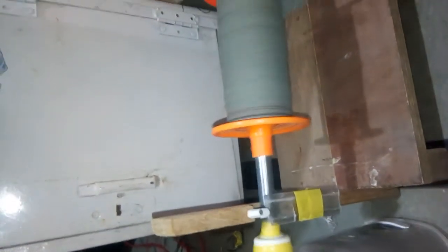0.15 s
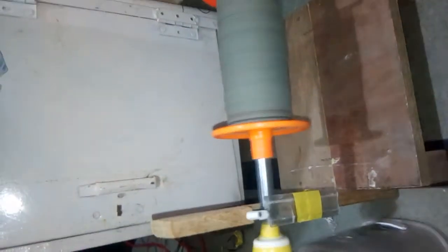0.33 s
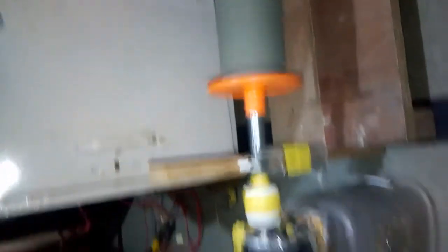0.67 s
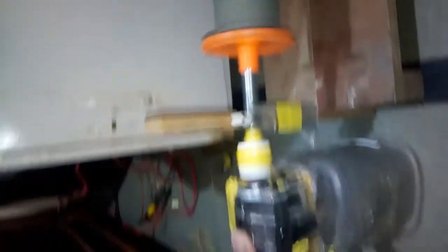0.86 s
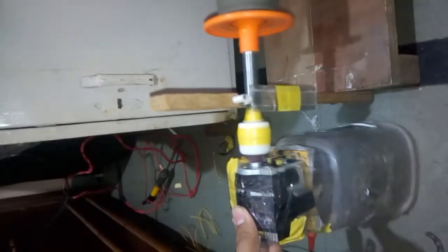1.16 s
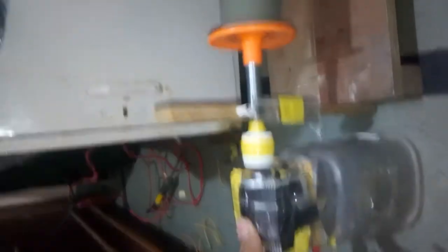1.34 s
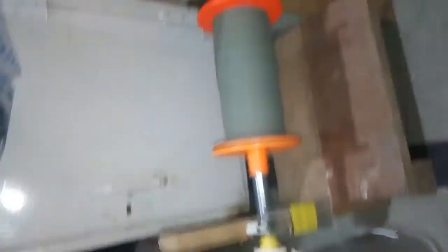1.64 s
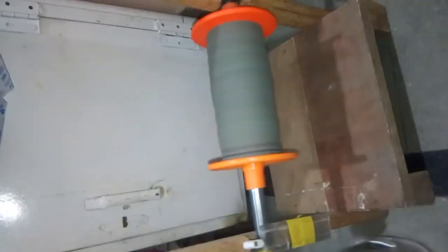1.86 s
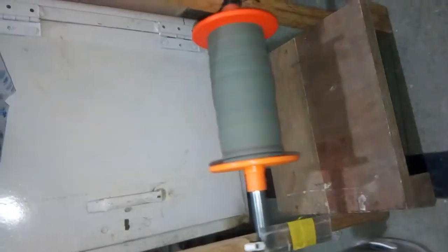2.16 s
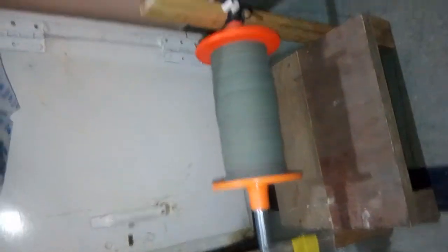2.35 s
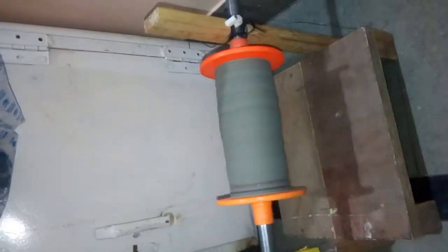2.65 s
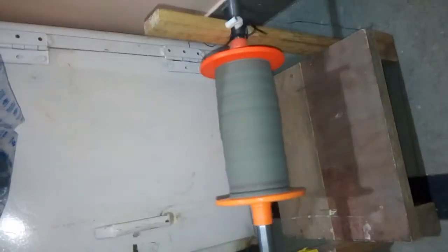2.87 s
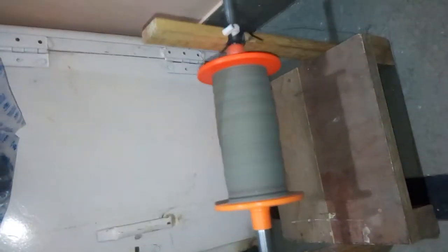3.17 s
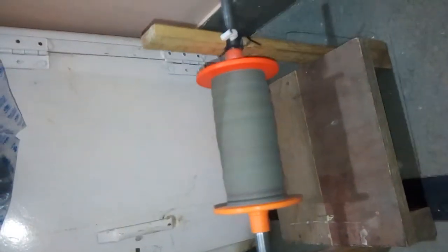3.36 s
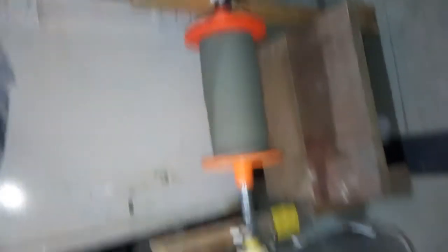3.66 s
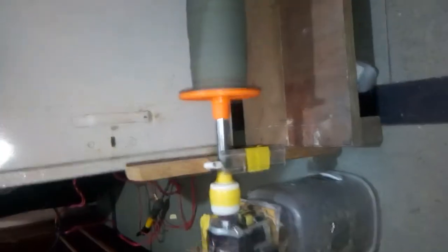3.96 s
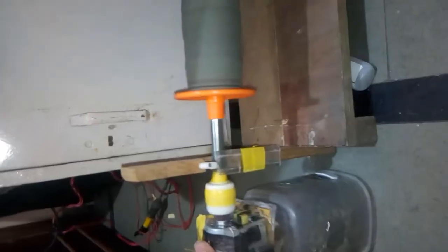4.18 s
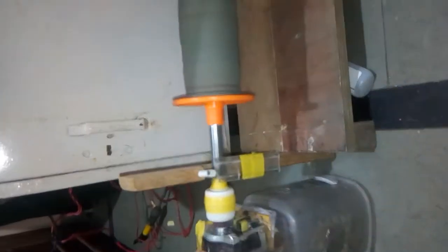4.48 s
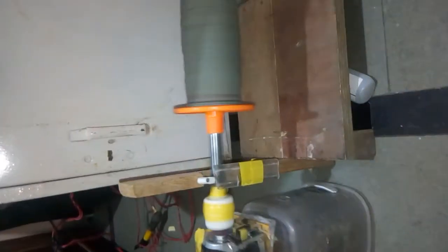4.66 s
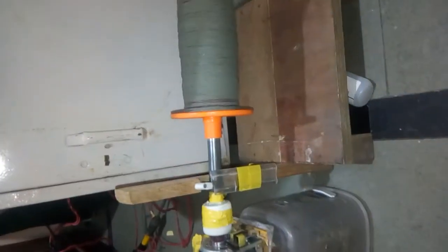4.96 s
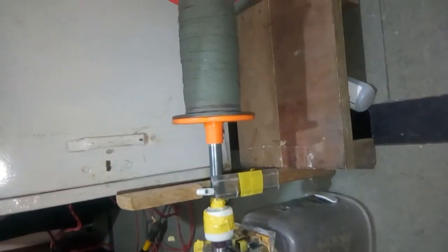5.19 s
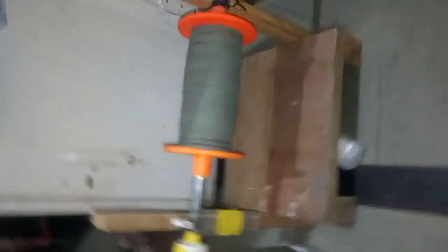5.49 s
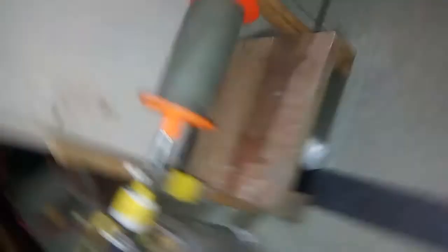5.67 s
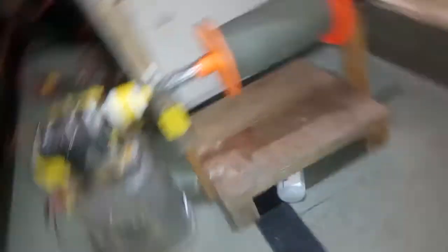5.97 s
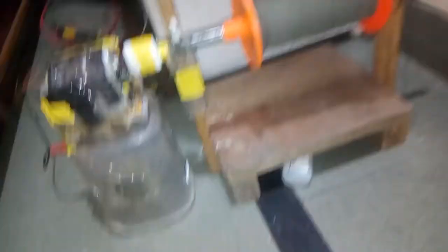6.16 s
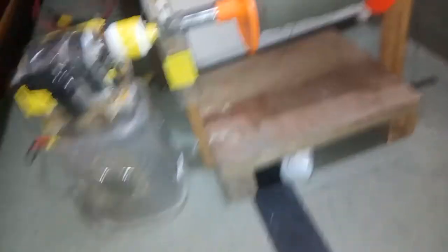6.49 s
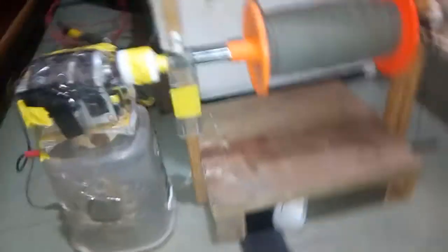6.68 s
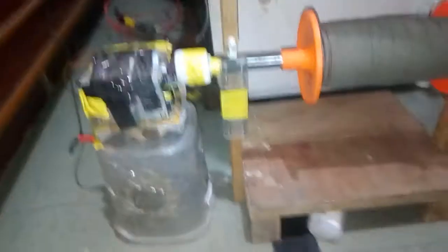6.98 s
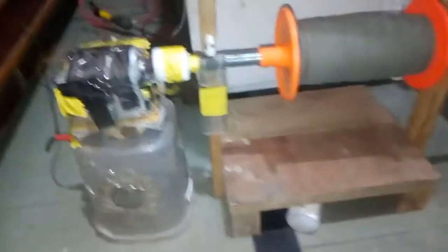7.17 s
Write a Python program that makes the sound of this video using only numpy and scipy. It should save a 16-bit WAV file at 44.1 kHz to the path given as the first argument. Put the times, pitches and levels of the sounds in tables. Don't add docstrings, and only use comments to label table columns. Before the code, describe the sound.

A small motor whips a thread reel round in a loud, fast, rattling buzz that dips, surges, then stops, leaving faint hum and handling rustles.

```python
import sys
import numpy as np
from scipy import signal
from scipy.fft import rfft, irfft, next_fast_len
from scipy.io import wavfile
from scipy.ndimage import uniform_filter1d, map_coordinates

SR = 44100
rng = np.random.default_rng(int(sys.argv[2]) if len(sys.argv) > 2 else 0)


def undo_db(level):
    steps = np.asarray(level, float) / 20
    return 10 ** steps


def transcribe(u):
    v = np.clip(np.atleast_2d(u).T, -1, 1)
    q = np.round(v * 32767).astype(np.int16)
    wavfile.write(sys.argv[1], SR, q)


N = 323253

# time in seconds, speed in turns per second.
REEL_SPEED = [(.0518, 11.56), (.258, 22.85), (.41, 26.96), (.743, 30.2), (.749, 29.27), (1.421, 31.11),
              (2.042, 27.5), (2.213, 22.67), (2.352, 15.64), (2.381, 18.89), (2.599, 12.1), (2.665, 19.68),
              (2.962, 30.25), (3.481, 33.12), (4.193, 33.41), (4.47, 31.92), (4.669, 15.6), (5.0155, .01)]
# time in seconds, nearness of the handheld phone in dB, lean on the rod in dB,
# strain in dB.
NEARNESS_AND_LOAD = [(0, -4, -0.5, -3), (.5, 0, 0, 3.5), (1.2, -1.5, -0.5, 0), (1.8, 0, -1, 1), (2.15, -1, 2, -0.5),
                     (2.6, 1, -4, 3.5), (3, -0.5, 0, -3.5), (3.6, -1, 0, -2), (4.1, -1, 0.5, -1.5),
                     (4.4, -2.5, 2.5, 5), (4.55, -1.5, -2, 1), (5.1, 2.5, -1, 2)]
FULL_SPEED = 34.3


def reel():
    # centre in Hz, width in Hz, level in dB.
    rod_modes = [(2500, 400, -4.5), (3170, 1800, -9.5), (3706, 700, -16), (4489, 415, 0), (5000, 680, -0.5),
                 (5645, 520, -1.5), (6440, 700, -7.5), (9130, 1700, -10.5), (10900, 1000, -9),
                 (15200, 1400, -4)]
    # centre in Hz, width in Hz, level in dB.
    frame_modes = [(555, 20, -11.5), (625, 53, -5.5), (707.7, 80, 1), (806, 91, -7), (870, 60, -15.5),
                   (950, 91, -19.5), (1060, 140, -19), (1239, 110, -7), (1307, 189, -11), (1710, 190, -18),
                   (1743, 69, -11), (1997, 65, -8.5), (2385, 250, -18), (3244, 1900, -33)]
    start, speed, clack_db, knock_db = turns()
    period = np.append(np.diff(start), .12)
    hit = start - .0018 + .0006 * luck(start) * (period < .04)
    steel = rod_clacks(hit, period, clack_db)
    wood = frame_knocks(hit, speed, knock_db) + undo_db(10) * steel
    return resonate(steel + undo_db(-54.5) * wood, rod_modes) + resonate(wood, frame_modes)


def turns():
    # time in seconds, extra knock in dB, extra clack in dB.
    uneven = [(.06, -6.5, -1.5), (.133, -4, 1.5), (.191, -3.5, 1.5), (.286, 3.5, -2), (.405, 1, -3),
              (.442, 1.5, -4), (.479, -3, -4.5), (.55, -1, -1.5), (.62, 0, -4), (.655, -3.5, 0.5),
              (1.158, -3, -2), (1.715, -2, -3.5), (1.818, 2, -3), (1.995, 0, 2), (2.105, 0.5, 0),
              (2.186, -4, 1.5), (2.277, 6.5, -2.5), (2.579, 0.5, 7.5), (2.651, -4.5, 1), (2.703, 0, -0.5),
              (2.749, 2, -3.5), (2.792, 4.5, 0), (3.106, 3.5, 2.5), (3.451, -2.5, 3.5), (3.511, -5, 1),
              (4.293, 2, -2.5), (4.447, -6.5, 3.5), (4.511, 4.5, -0.5), (4.635, -3, 2.5), (4.887, -7.5, 1)]
    speed = reel_speed()
    angle = np.cumsum(speed)
    angle = (angle - angle[round(REEL_SPEED[0][0] * SR)]) / SR
    last = int(angle[round(REEL_SPEED[-1][0] * SR)])
    at = np.searchsorted(angle, np.arange(last + 1))
    start = at / SR
    near_db, lean_db, _ = curves(NEARNESS_AND_LOAD)
    coasting = np.gradient(speed) < 0
    clack_db = (-18 + near_db + lean_db + coasting * speed_law(40, 19.8))[at]
    knock_db = (-14.5 + near_db - lean_db + speed_law(32, FULL_SPEED))[at]
    for s, more_knock_db, more_clack_db in uneven:
        which = np.argmin(np.abs(start + .008 - s))
        knock_db[which] += more_knock_db
        clack_db[which] += more_clack_db
    return start, speed[at], clack_db, knock_db


def rod_clacks(hit, period, clack_db):
    spread_db = 2.1 * np.clip(1.8 - 30 * period, .3, 1)
    steel = bursts(hit, clack_db + 20.72 + spread_db * luck(hit), rise=.0014, t60=.036)
    far_side = hit + (.6 + .028 * luck(hit)) * period
    far_db = clack_db + 8.1 - 300 * np.maximum(period - .076, 0) + 3 * luck(hit)
    steel += bursts(far_side, far_db, rise=.00036, t60=.012)
    loose, stray = luck(hit), luck(hit)
    chatter = hit + (.21 + .25 * np.abs(loose)) * period
    steel += bursts(chatter, clack_db + 2.5 + 3 * stray, rise=.0014, t60=.064)
    late = hit + (.88 + .13 * stray) * period
    steel += bursts(late, clack_db + 3 + 4 * loose, rise=.0004, t60=.012)
    return steel


def frame_knocks(hit, speed, knock_db):
    seat = hit + .004 + .00023 * speed + .0008 * luck(hit)
    wood = blows(seat, knock_db + 49.2 + 2.3 * luck(hit))
    wood += bursts(seat + .002, knock_db + 29, rise=.00021, t60=.012)
    wood += blows(seat + .001419 + .0005 * luck(hit), knock_db + 42)
    rebound = seat + .0115 + .0025 * luck(hit)
    wood += blows(rebound, knock_db + 40 + 3.6 * luck(hit))
    wood += bursts(rebound, knock_db + 21, rise=.0036, t60=.049)
    return wood


def motor():
    # frequency in Hz, density in dB per Hz.
    rattle_spectrum = [(450, -26), (590, 10), (870, 4), (1540, -5), (1990, -4.5), (3230, -7.5),
                       (5590, -5.5), (8250, -41), (12000, -44.5), (15300, -31.5), (16500, -48.5)]
    # frequency in Hz, density in dB per Hz.
    rumble_spectrum = [(22, -12), (33, -28.5), (45, -29.5), (62, -6), (75, -11.5), (95, -1.5), (200, -1.5),
                       (350, -0.5), (452, -9.5), (520, -7.5), (680, -36.5), (1100, -120)]
    orders = (2, 3, 7, 10)
    orders_db = (-61.5, -60.5, -48.5, -56)
    near_db, _, strain_db = curves(NEARNESS_AND_LOAD)
    grains_db = 3.5 * wobble(300) + 2.2 * wobble(40)
    rattle = unit(undo_db(grains_db) * hiss(rattle_spectrum))
    rattle_db = -19.5 + near_db + speed_law(31.5, FULL_SPEED) - 3.5
    rumble = unit(undo_db(1.8 * wobble(30)) * hiss(rumble_spectrum))
    shaft = 2 * np.pi * np.cumsum(reel_speed()) / SR
    hum = sum(undo_db(db + 3.5 + 3 * wobble(8.2)) * np.sin(k * shaft) for k, db in zip(orders, orders_db))
    hum = hum * undo_db(speed_law(50, FULL_SPEED))
    stall = undo_db(speed_law(23, 12.6))
    return undo_db(rattle_db) * rattle + stall * (undo_db(-36.5 + strain_db) * rumble + hum)


def rustle():
    # start in seconds, hold in seconds, level in dB, dull part in dB.
    cloth_rubs = [(4.8, .15, -51.5, 4), (5.102, 0.034, -63, -3), (5.18, .01, -56, 0),
                  (5.325, .08, -72, -24), (5.51, 0.5, -50, -3.5), (6.122, .02, -55, -20),
                  (6.176, 0.033, -60, -8), (6.3, 0.029, -54.5, -22), (6.394, .02, -53, -7.5),
                  (6.508, 0.12, -50, -10), (6.629, 0.036, -51.5, 4), (6.787, .01, -57.5, -8),
                  (6.86, 0.012, -52.5, -10), (6.933, .01, -59, -19), (7.112, .04, -65, -13.5),
                  (7.196, .03, -64.5, -21.5), (7.272, .04, -60, -18)]
    # frequency in Hz, density in dB per Hz.
    weave = [(1060, -33), (1800, -13), (2700, -4.5), (5790, 1.5), (6410, -6), (8310, -38.5), (12500, -40.5),
             (15500, -29), (16500, -38.5)]
    folds = [(400, -40), (700, -8.5), (1500, -4), (2300, -2), (3000, -37), (4000, -120)]
    t = np.arange(N)[::64] / SR
    bright, dull = np.zeros(N), np.zeros(N)
    for s, hold, db, dull_db in cloth_rubs:
        rise = (s - t) / (.012 + .4 * hold)
        fall = (t - s - hold) / .065
        rub = undo_db(db - 20 * np.maximum(np.maximum(rise, fall), 0)).repeat(64)[:N]
        bright += rub
        dull += undo_db(dull_db - 9) * rub
    bright += undo_db(-72)
    return undo_db(-1.27) * bright * patchy(hiss(weave), depth_db=2.5) + dull * hiss(folds)


def scuff():
    # time in seconds, length in seconds, level in dB.
    slides = [
        (5.177, 0.004, -50.5),
        (6.586, .022, -46.5),
        (6.655, .012, -52),
    ]
    skin = [(2500, -30), (5000, -1), (6200, 1.5), (7500, -16), (9500, -34), (13000, -36), (15500, -32.5)]
    t = np.arange(N) / SR
    return sum(undo_db(db) * np.exp(-((t - s) / length) ** 2) for s, length, db in slides) * hiss(skin)


def squeak():
    # time in seconds, first partial in dB, second partial over it in dB.
    slip = [
        (6.36, -67, -14),
        (6.388, -43, -26),
        (6.42, -34.5, -11),
        (6.45, -33.5, -8),
        (6.47, -37.5, 4),
        (6.485, -39, -18),
        (6.5, -56, 13),
        (6.6, -61, -12),
        (6.62, -73, -11),
    ]
    first_db, over_db = curves(slip)
    second_db = first_db + over_db
    third_db = np.roll(second_db, round(.022 * SR)) - 45
    phase = 2 * np.pi * 2746 * np.arange(N) / SR
    partials_db = first_db, second_db, third_db
    return sum(undo_db(db - 1 + .8 * k * wobble(70)) * np.sin(k * phase) for k, db in enumerate(partials_db, 1))


def tap():
    # level in dB, frequency in Hz, width in seconds.
    pulse = (-15.5, 620, 0.00058)
    db, hz, width = pulse
    t = np.arange(N) / SR - 6.6466
    finger = np.exp(-(t / width) ** 2) * np.cos(2 * np.pi * hz * t)
    nail = .1 * np.exp(-(t / .00042) ** 2) * np.cos(2 * np.pi * 2300 * t)
    recoil = .34 * (t > 0) * np.exp(-np.abs(t) / .0023) * (1 - np.exp(-(t / .001) ** 2))
    return undo_db(db) * (finger + nail - recoil)


def background():
    # frequency in Hz, level in dB.
    hum_lines = [(75, -68), (124.7, -44.5), (249.4, -63)]
    # frequency in Hz, density in dB per Hz.
    air = [(18, 9.5), (28, 6), (42, -8), (75, 1), (124, -4.5), (170, 0), (250, -5.5), (330, -11),
           (700, -20), (1500, -27), (3000, -33.5), (5500, -15), (6800, -35), (8000, -46.5), (16000, -49.5)]
    # time in seconds, frequency in Hz, length in seconds, level in dB.
    far_tones = [
        (5.04, 420, .06, -66),
        (5.56, 610, .06, -69),
        (5.7, 430, .08, -70),
        (7.28, 555, .1, -66),
        (7.13, 2520, .4, -74),
        (6.83, 1750, .3, -75),
    ]
    t = np.arange(N) / SR
    drift = np.cumsum(1 + .006 * wobble(5.8)) / SR
    hum = sum(undo_db(db + 3 + .7 * wobble(6.7)) * np.sin(2 * np.pi * hz * drift) for hz, db in hum_lines)
    far = np.zeros(N)
    for s, hz, length, db in far_tones:
        swell = np.exp(-(2 * (t - s) / length) ** 2)
        far += undo_db(db + 2.5 * wobble(40)) * swell * np.sin(2 * np.pi * hz * t)
    loud = np.clip(reel_speed() / 18 - .4, 0, 1)
    return undo_db(-8 * loud) * hum + far + undo_db(-56) * patchy(hiss(air), depth_db=3)


def room(x):
    # frequency in Hz, time to fall by 60 dB in seconds.
    wall_decay = [(200, 0.34), (2000, 0.21), (8000, 0.33)]
    hz, t, z = signal.stft(rng.standard_normal(SR // 3), SR, nperseg=256)
    decay = undo_db(-60 * t / along(wall_decay, hz)[:, None])
    tail = signal.istft(z * decay, SR, nperseg=256)[1]
    return signal.fftconvolve(np.pad(x, (300, 0)), tail / np.linalg.norm(tail))[:N]


def reel_speed():
    return curves(REEL_SPEED, None)[0]


def speed_law(law_db, under):
    return law_db * np.log10(np.clip(reel_speed() / under, 1e-4, 1))


def luck(like):
    return rng.standard_normal(len(like))


def blows(s, db):
    return np.bincount(np.clip(s * SR, 0, N - 1).astype(int), undo_db(db), N)


def bursts(s, db, rise, t60):
    t = np.arange(SR // 12) / SR
    envelope = (1 - np.exp(-t / rise)) * undo_db(-60 * t / t60)
    return signal.oaconvolve(blows(s, db), envelope)[:N] * rng.standard_normal(N)


def resonate(x, modes):
    def response(f):
        total = 0
        for k, (c, w, db) in enumerate(modes):
            damping = 1j * f * w
            total = total + (-1) ** k * undo_db(db) * damping / (c * c - f * f + damping)
        return total
    return filtered(x, response)


def filtered(x, response):
    m = next_fast_len(N + SR // 2)
    return irfft(rfft(x, m) * response(np.fft.rfftfreq(m, 1 / SR)), m)[:N]


def hiss(spectrum):
    return unit(filtered(rng.standard_normal(N), lambda hz: undo_db(along(spectrum, hz))))


def patchy(x, depth_db):
    z = signal.stft(x, nperseg=512)[2]
    field = uniform_filter1d(rng.standard_normal(z.shape), 12, 0)
    field = uniform_filter1d(field, 8, 1)
    return unit(signal.istft(z * undo_db(depth_db * unit(field)), nperseg=512)[1][:N])


def wobble(rate):
    knots = rng.standard_normal(int(N * rate / SR) + 4)
    return map_coordinates(knots, [np.arange(N) * rate / SR])


def curves(rows, outside=-120):
    s, *cols = np.transpose(rows)
    return [np.interp(np.arange(N) / SR, s, c, outside, outside) for c in cols]


def along(points, hz):
    f, v = np.transpose(points)
    return np.interp(np.log(hz + 1), np.log(f + 1), v)


def unit(x):
    return x / np.sqrt(np.mean(x ** 2) + 1e-20)


def scene():
    # frequency in Hz, gain in dB.
    phone_path = [(150, -1), (300, 4), (460, -17.5), (550, 0.5), (6500, -0.5), (7300, -5.5), (8500, -24),
                  (12000, -34.5), (16000, -29)]
    knocks = filtered(reel(), lambda hz: undo_db(along(phone_path, hz)))
    handling = rustle() + scuff() + squeak() + tap()
    return (knocks + undo_db(-13) * room(knocks) + motor() + background() + handling)[None]


def low_pass(x):
    return signal.sosfilt(signal.butter(12, 16990, fs=SR, output="sos"), x)


def record(dry):
    soft = dry[0] / (1 + np.abs(dry[0] / .95) ** 4) ** (1 / 4)
    mix = filtered(soft, lambda hz: np.where(hz < 15850, 1, .03))[None]
    return low_pass(mix)


dry = scene()
out = record(dry)
transcribe(out)
```